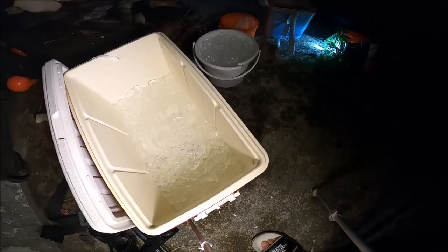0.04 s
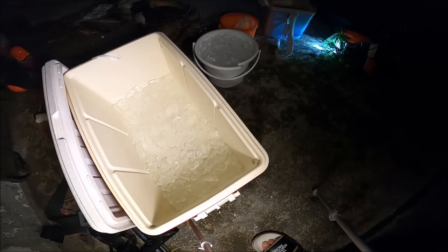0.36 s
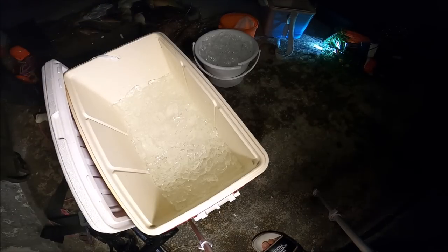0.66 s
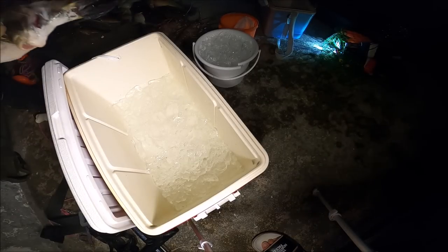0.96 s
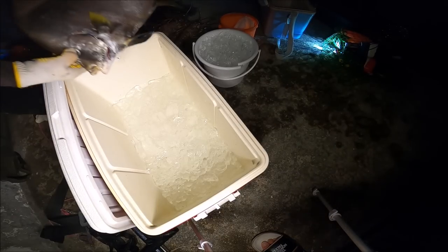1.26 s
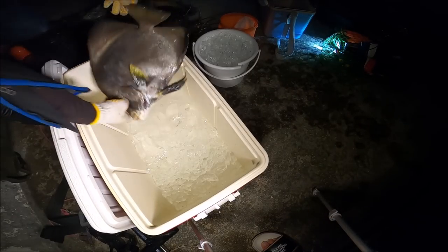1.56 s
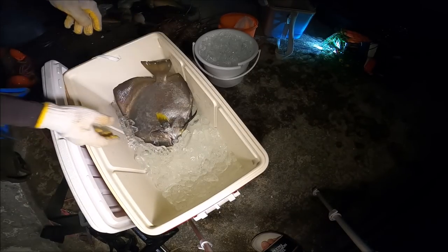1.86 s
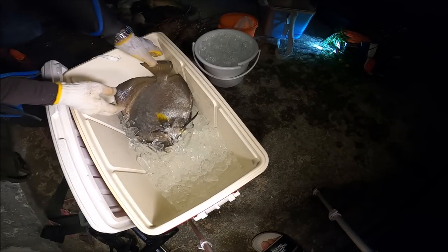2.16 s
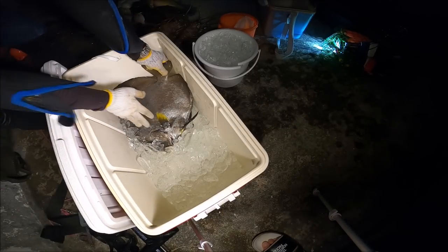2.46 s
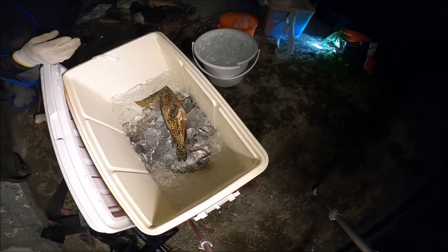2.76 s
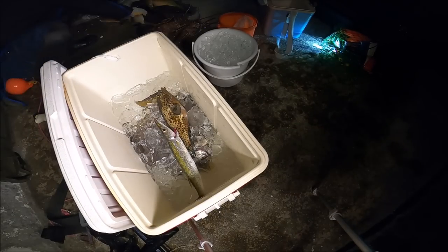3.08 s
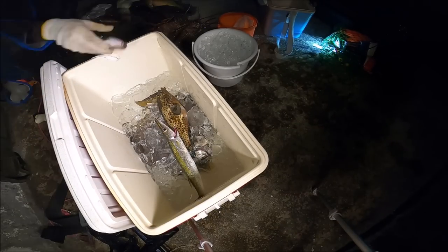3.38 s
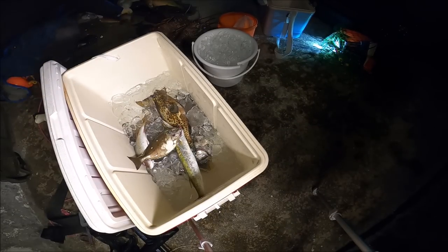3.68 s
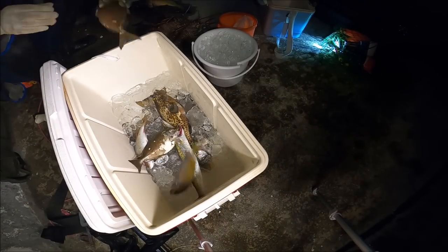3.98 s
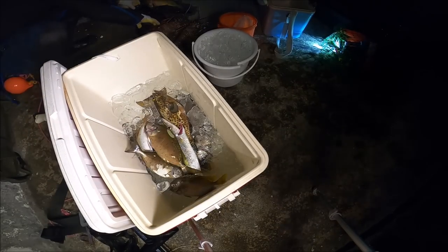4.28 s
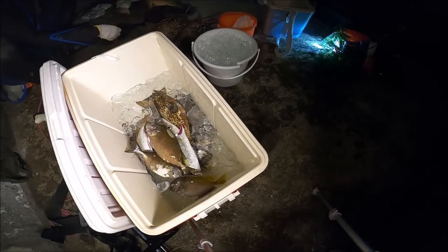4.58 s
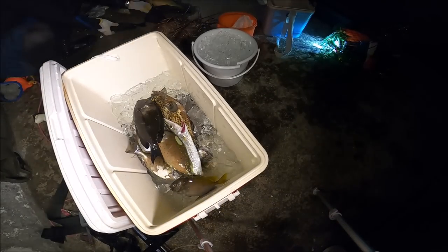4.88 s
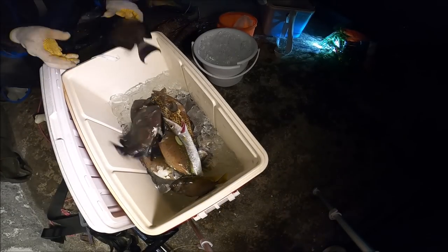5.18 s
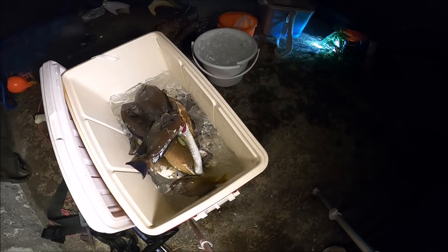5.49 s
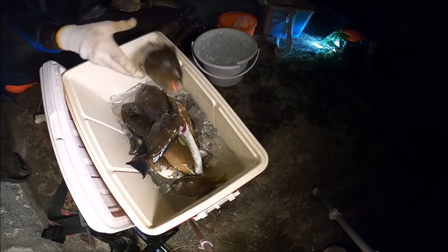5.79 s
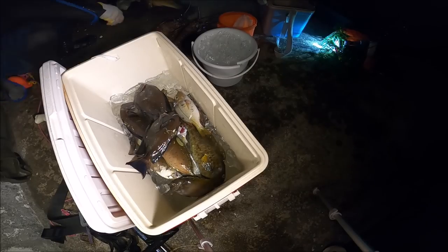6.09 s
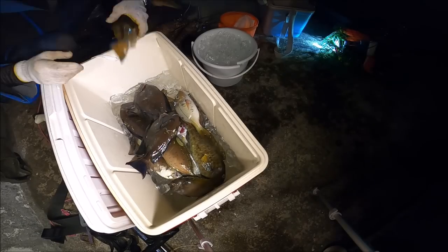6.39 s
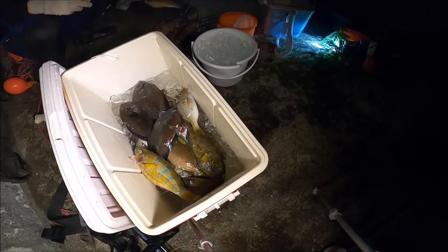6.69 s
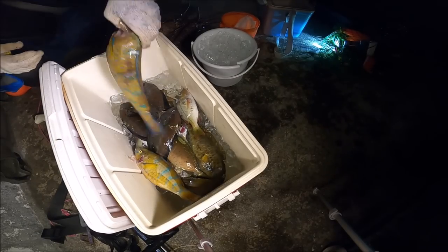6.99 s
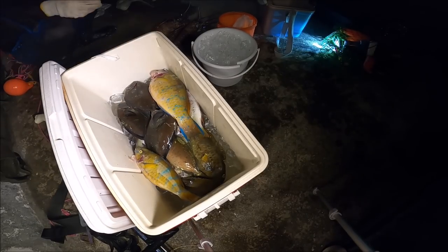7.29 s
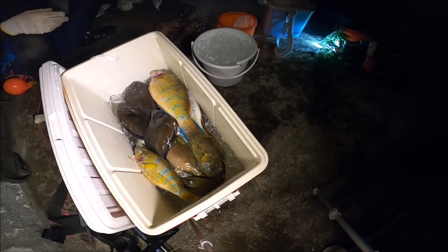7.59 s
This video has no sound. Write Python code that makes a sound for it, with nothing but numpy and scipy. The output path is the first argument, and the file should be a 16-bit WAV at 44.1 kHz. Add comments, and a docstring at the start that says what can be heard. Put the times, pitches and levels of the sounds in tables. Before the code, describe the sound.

Wind buffets the microphone as a big fish crunches into ice in a plastic cooler, then smaller fish land with wet slaps.

```python
"""Fish are packed into a plastic cooler outdoors, with wind on the microphone. First a breeze, a faint sinking
whistle and rustles as a big fish is carried over. At 1.5 s it crunches down into the ice: cubes grind and
knock, and the box booms under its weight. At 2.6 s the scene changes: the wind is stronger and smaller fish
land one after another: water films burst in wet slaps, trapped air pops, droplets tick and the pile settles
with a crackle."""
import sys
import numpy as np
from scipy import signal
from scipy.fft import rfft, irfft
from scipy.io import wavfile
from scipy.ndimage import uniform_filter1d

SR = 44100
rng = np.random.default_rng(int(sys.argv[2]) if len(sys.argv) > 2 else 0)


def wav_out(sig):
    """Save sig, one row per channel (or a flat mono array), as 16-bit PCM at SR to the path in sys.argv[1]."""
    wavfile.write(sys.argv[1], SR, np.round(np.clip(np.atleast_2d(sig).T, -1, 1) * 32767).astype(np.int16))


N = 346185

# open air, calm and windy: f/Hz, density/dB
CALM_SPECTRUM = [(40, 3.5), (180, -1), (300, -8.5), (480, -7), (900, -13.5), (2000, -19), (4000, -27.5),
                 (9000, -37), (12500, -47.5), (15000, -72)]
WINDY_SPECTRUM = [(30, -4.5), (120, -1), (350, -11.5), (750, -7), (1200, -20), (2100, -21), (3300, -27.5),
                  (5000, -29), (9000, -34.5), (15500, -40)]
# open air, calm and windy: t/s, level/dB
CALM_CURVE = [(0, -45.5), (.4, -44.5), (.75, -48.5), (1.0, -49.5), (1.25, -47), (1.45, -45.5), (2.4, -49),
              (2.62, -46)]
WINDY_CURVE = [(2.616, -42), (3.2, -44.5), (3.7, -45), (4.2, -42), (4.55, -42.5), (5.1, -41.5),
               (5.6, -42.5), (6.098, -42.5), (6.45, -39), (6.85, -37.5), (7.3, -39), (7.7, -43),
               (7.85, -45)]
# sinking whistle: t/s, f/Hz, level/dB
WHISTLE_CURVE = [(.28, 2040, -73), (.33, 1996, -61), (.44, 1890, -62), (.6, 1820, -61), (0.721, 1727, -63),
                 (.8, 1604, -59)]
# gusts at the microphone: peak t/s, level/dB, rise/s, fade/s
GUST_SWELLS = [(.21, -30.5, .24, 0.27), (.36, -27.5, .07, 0.13), (.66, -33.5, .07, .6),
               (.93, -16.5, 0.1, 0.044), (1.0, -23, 0.093, 0.07), (1.09, -24.5, 0.045, 0.086),
               (1.2, -24.5, 0.11, .19), (2.23, -26.5, 0.081, 0.066), (2.37, -29, .06, 0.44),
               (2.79, -20.5, 0.029, 0.13), (2.98, -20.5, 0.04, 0.15), (3.2, -35, 0.081, 0.074),
               (3.41, -31.5, 0.027, .035), (3.865, -15.5, 0.18, 0.069), (4.31, -18.5, 0.16, 0.26),
               (4.56, -23, 0.11, 0.028), (4.66, -36, 0.069, 0.14), (4.89, -31, 0.15, 0.086),
               (5.035, -27.5, 0.13, 0.036), (5.14, -25.5, .04, 0.063), (5.45, -29, .07, 0.33),
               (5.56, -21, 0.043, 0.091), (5.75, -27.5, 0.023, 0.096), (5.9, -13, 0.047, 0.039),
               (5.965, -16, 0.077, 0.023), (6.13, -36.5, .04, 0.31), (6.35, -40, 0.041, 0.091),
               (6.465, -15.5, 0.025, .07), (6.69, -17, 0.21, 0.067), (6.8, -26, 0.033, 0.82),
               (7.02, -15.5, 0.064, 0.095), (7.2, -18, 0.25, 0.095), (7.33, -29.5, 0.29, 0.34),
               (7.59, -23, 0.058, 0.046)]
# wind at the microphone, light and strong: f/Hz, density/dB
BREEZE_SPECTRUM = [(10, -5), (30, 2.5), (60, 0), (120, -9), (190, -14.5), (330, -28.5), (700, -46),
                   (2000, -61), (12000, -110)]
GUST_SPECTRUM = [(15, -26), (45, -2.5), (90, 1.5), (220, 0), (400, -6.5), (700, -14), (1100, -23),
                 (2000, -37.5), (4000, -67), (15000, -85)]
# hardest single eddies: t/s, level/dB, f/Hz
EDDIES = [(.364, -22, 55), (.925, -18.5, 112), (1.2, -17, 55), (2.994, -16.5, 139), (4.299, -11.5, 235),
          (4.338, -14, 270), (4.403, -20.5, 290), (4.624, -22, 128), (5.139, -19.5, 101),
          (6.467, -12.5, 189), (6.68, -12, 150), (7.588, -15.5, 155)]
# sudden gust fronts: t/s, level/dB, t60/s
GUST_FRONTS = [(3.701, -28, .2), (3.812, -20.5, 0.2), (4.257, -17, 0.062), (4.396, -18, 0.038),
               (5.848, -18, 0.051), (6.449, -25, 0.19), (6.599, -18, 0.29), (6.666, -24, .13),
               (6.999, -18.5, 0.27), (7.038, -22, .047)]
# friction as the big fish is carried: t/s, level/dB, centre f/Hz, t60/s
CARRY_RUSTLES = [(.257, -48.5, 3500, .05), (.374, -48, 2600, 0.037), (.637, -54.5, 5530, .06),
                 (0.655, -49.5, 3800, 0.067), (0.776, -40, 830, 0.28), (.833, -49, 4640, 0.027),
                 (.95, -53.5, 3300, .1), (1.086, -56, 5000, .05), (1.151, -49, 3500, 0.076),
                 (1.237, -40.5, 2300, 0.036), (1.254, -44, 930, 0.12), (1.337, -52, 5530, .05),
                 (1.37, -53.5, 4000, 0.37)]
# the pile of fish slides: peak t/s, level/dB
PILE_SLIDES = [(2.84, -63), (3.42, -55), (4.0, -54.5), (4.48, -52.5), (5.18, -52), (6.67, -56),
               (7.03, -48.5), (7.28, -57)]
# stray droplets: t/s, level/dB, f/Hz
STRAY_DROPS = [(2.7425, -31, 11000), (2.749, -25.5, 6000), (2.758, -27, 11000), (2.875, -35, 12500),
               (3.601, -22.5, 10900), (4.2244, -37, 9000), (4.428, -36, 12400), (4.48, -36, 9000),
               (5.998, -39, 9000), (6.31, -33.5, 12900), (6.332, -28, 13900), (6.666, -20, 13700),
               (6.762, -33, 9900), (6.843, -34, 12100)]
# trapped air escapes: t/s, level/dB, f/Hz
AIR_POCKETS = [(2.667, -10, 1630), (2.6702, -6, 905), (2.6886, -21, 870), (2.702, -16, 2620),
               (2.7079, -13.5, 1650), (2.7099, -18, 720), (2.9439, -11, 680), (2.9462, -14, 952),
               (3.5044, -11.5, 1880), (4.0691, -12, 1830), (4.1659, -11.5, 1730), (4.7735, -13.5, 960),
               (5.2573, -13, 2960), (5.2602, -16.5, 1630), (5.302, -15.5, 3120), (5.8985, -11, 4310),
               (5.9038, -14.5, 1930), (5.9039, -14, 830), (6.4753, -15, 1080), (7.15, -13.5, 1700),
               (7.7824, -11.5, 1480), (7.7908, -16.5, 1830)]
# cube hits cube: t/s, level/dB, f/Hz
CUBE_KNOCKS = [(1.502, -23.5, 1080), (1.517, -23, 3740), (1.521, -23.5, 1860), (1.82, -17, 4380),
               (1.823, -23, 2540), (1.928, -14, 1490), (1.974, -19.5, 2900), (1.998, -19.5, 3300),
               (2.032, -19.5, 2330), (2.197, -27.5, 2300), (2.239, -34, 2740), (2.265, -37, 2940),
               (2.281, -31.5, 2960), (6.489, -28, 3970), (6.519, -20, 3390), (6.603, -27, 3800)]
# modes of the filled box: f/Hz, nominal width/Hz, level/dB
BOX_MODES = [(162, 24.4, 4), (221.4, 38, 4.5), (391, 67, 5.5), (472, 58, -8), (730, 162, -3.5),
             (1010, 180, -19.5)]
# the big fish loads the box floor: t/s, level/dB
FLOOR_THUMPS = [(1.504, -30), (1.728, -20.5), (1.83, -12), (1.942, -14.5)]
# the big fish touches, shifts, sinks in, settles: t/s, push/dB, grind/dB, hold/s, t60/s
ICE_PRESSES = [(1.498, -20.5, -32, 0.061, 0.3), (1.705, -28.5, -40, 0.026, 0.25),
               (1.797, -18, -18.5, .17, 0.49), (2.193, -52, -47, 0.078, .06)]
# grinding ice: f/Hz, density/dB
ICE_SPECTRUM = [(300, -31), (800, -2), (1250, -5), (1550, 0), (2000, 0), (2500, 0), (3300, -3.5),
                (4500, -9), (6500, -16.5), (10000, -26), (14000, -42), (16000, -54)]
# sharper notes in the ice: f/Hz, width/Hz, level/dB
ICE_MODES = [(1510, 51, 10), (2430, 76, 3), (3080, 100, -20), (4300, 77, -21)]
# wet skin hits skin or ice: t/s, level/dB, rise/s, t60/s, relative mist/dB, relative squelch/dB
FISH_LANDINGS = [(2.658, -15, 0.0041, 0.14, 8.5, -2.5), (2.697, -19.5, 0.011, 0.062, 2, 2),
                 (2.803, -31.5, 0.0012, 0.067, -17, 10), (2.9398, -17.5, 0.0037, 0.18, 7.5, -2),
                 (3.4993, -11.5, 0.0029, 0.038, 3.5, -4), (3.5179, -24.5, 0.0034, 0.021, -9, 5.5),
                 (3.5456, -24, .008, .14, 7, -7.5), (4.04, -21.5, 0.0083, 0.051, 10, -5.5),
                 (4.0678, -16.5, .001, 0.055, 1.5, -4), (4.1045, -21, 0.002, 0.19, 1.5, -3.5),
                 (4.1651, -13.5, 0.00055, 0.015, -15, -1.5), (4.7665, -15.5, .004, 0.12, 1, -3.5),
                 (4.811, -32, .008, 0.07, -2, -3), (4.8433, -36, 0.0018, .035, 1, 6),
                 (5.25, -18, 0.0063, 0.068, 0.5, -1.5), (5.2934, -19.5, 0.0046, 0.1, -0.5, 0),
                 (5.898, -16, .0024, 0.14, -1.5, 0.5), (5.917, -20, .008, 0.076, 9, -1),
                 (5.975, -22, 0.0061, 0.046, -3, -1.5), (6.475, -31.5, .001, 0.33, -11, 6.5),
                 (6.51, -25.5, .006, .08, 2, -2.5), (6.5396, -27, .001, 0.028, -1, 5),
                 (6.56, -26.5, .01, .09, -5, 4), (6.602, -25.5, .0005, 0.018, 1, -13),
                 (7.014, -34.5, 0.0043, 0.19, -21, 13.5), (7.087, -32, 0.0054, .03, -7, -7),
                 (7.1395, -18, 0.01, .045, -3, 0), (7.163, -24, .0037, 0.057, 1, 2),
                 (7.1794, -22.5, .001, 0.042, -3, 3), (7.773, -18, 0.0048, 0.099, -1, -0.5)]
# coarse spray, fine mist, hollows under a fish: f/Hz, density/dB
SPRAY_SPECTRUM = [(400, -9), (1000, 5), (2400, -6.5), (3200, 3.5), (4500, 3.5), (7000, 0.5), (9000, -8),
                  (15000, -5.5)]
MIST_SPECTRUM = [(4000, -14), (7000, -3), (9000, -1), (12000, -1), (15500, -4)]
HOLLOW_SPECTRUM = [(150, -3), (400, -17.5), (650, 1.5), (950, -6), (1300, -6), (1700, -2.5), (2000, -5),
                   (2400, -14.5), (3100, -10), (5500, -54.5)]


def amp(db):
    """dB to gain."""
    return 10 ** (np.asarray(db) / 20)


def unit(x):
    """Scale to rms 1."""
    return x / np.sqrt(np.mean(x ** 2) + 1e-20)


def clock():
    """Sample times in s."""
    return np.arange(N) / SR


def decay(t, t60_s):
    """Gain falling 60 dB in t60_s."""
    return np.exp(-np.log(1000) * t / t60_s)


def add(mix, at_s, sound):
    """Mix a sound in at at_s."""
    part = mix[round(at_s * SR):][:len(sound)]
    part += sound[:len(part)]


def level(times_s, levels_db):
    """Gain along a level curve, silent outside it."""
    return amp(np.interp(clock(), times_s, levels_db, left=-140, right=-140))


def swells(rows, span_db=20):
    """Gain of swells summed in power; each rise and fade covers span_db."""
    t = clock()[::64]
    power = sum(amp(db - span_db * np.maximum((peak_s - t) / rise_s, (t - peak_s) / fade_s)) ** 2
                for peak_s, db, rise_s, fade_s in rows)
    return np.interp(clock(), t, np.sqrt(power))


def colour(x, spectrum):
    """Filter x by a spectrum; rms 1."""
    hz, db = np.transpose(spectrum)
    f = np.fft.rfftfreq(N, 1 / SR)
    gain = amp(np.interp(np.log(f + 1), np.log(hz), db))
    return unit(irfft(rfft(x) * gain, N))


def hiss(spectrum):
    """Coloured Gaussian noise, rms 1."""
    return colour(rng.standard_normal(N), spectrum)


def wander(rate_hz):
    """Random drift up to about rate_hz, rms 1."""
    f = np.fft.rfftfreq(N, 1 / SR)
    return unit(irfft(rfft(rng.standard_normal(N)) * np.exp(-(f / rate_hz) ** 2), N))


def flicker(depth_db, rate_hz):
    """Gain drifting by depth_db rms."""
    return amp(depth_db * wander(rate_hz))


def grains(per_s, spread_db):
    """Random clicks of either sign and uneven size, rms 1."""
    size = amp(spread_db * np.minimum(rng.exponential(1, N), 4))
    return unit(size * rng.choice([-1, 1], N) * (rng.random(N) < per_s / SR))


def resonate(x, hz, width_hz):
    """One resonance, peak gain 1."""
    return signal.lfilter(*signal.iirpeak(hz, hz / width_hz, SR), x)


def turbulence(spectrum, evenness, span_s):
    """Noise with its own swells flattened by evenness (0 to 1), rms 1."""
    noise = hiss(spectrum)
    power = abs(uniform_filter1d(noise ** 2, int(span_s * SR))) + 1e-9
    return unit(noise / power ** (evenness / 2))


def open_air():
    """Soft outdoor wash, louder in the windier second scene."""
    calm = level(*np.transpose(CALM_CURVE)) * hiss(CALM_SPECTRUM) * flicker(0.65, 26)
    windy = level(*np.transpose(WINDY_CURVE)) * hiss(WINDY_SPECTRUM) * flicker(1.5, 33)
    return calm + windy


def whistle(core_hz=110, halo_hz=650, halo_db=3):
    """A narrow noise band inside a wider one, both sinking in pitch."""
    times_s, hz, db = np.transpose(WHISTLE_CURVE)
    carrier = np.exp(2j * np.pi * np.cumsum(np.interp(clock(), times_s, hz)) / SR)
    core, halo = (wander(width_hz) + 1j * wander(width_hz) for width_hz in (core_hz, halo_hz))
    return level(times_s, db) * (carrier * (core + amp(halo_db) * halo)).real


def wind(windier_s=2.62, breeze_db=1, gust_db=-1, tear_db=-19, strong_db=-20):
    """Gusts press on the microphone; after windier_s the strongest tear into a brighter flutter."""
    windier = clock() > windier_s
    lull = np.where(windier, amp(-46), amp(-43))
    force = np.hypot(swells(GUST_SWELLS), lull)
    breeze = amp(breeze_db) * force * ~windier
    gust = amp(gust_db) * force * windier
    flutter = hiss([(200, -24), (600, 14), (1100, -4), (2000, -7), (4000, -19.5), (15000, -54)])
    tearing = amp(tear_db) * gust ** 2 / amp(strong_db) * flutter * flicker(3.9, 90)
    rumble = breeze * turbulence(BREEZE_SPECTRUM, evenness=0.26, span_s=0.074)
    roar = gust * turbulence(GUST_SPECTRUM, evenness=0.34, span_s=0.036)
    return rumble + roar + tearing


def eddies(jitter_cycles=0.13, length_s=0.014):
    """Each eddy is a brief, uneven swing of pressure on the microphone."""
    out, t = np.zeros(N), np.arange(SR // 5) / SR - 0.1
    jitter = jitter_cycles * wander(200)
    window = np.exp(-(2 * t / length_s) ** 2)
    for (at_s, db, hz), phase in zip(EDDIES, rng.random(len(EDDIES))):
        swing = np.sin(2 * np.pi * (hz * t + phase + jitter[round(at_s * SR):][:len(t)]))
        add(out, at_s + t[0], amp(db) * window * swing)
    return out


def gust_fronts(rise_s=0.0053):
    """A front slams in and flutters as it dies."""
    force, t = np.zeros(N), np.arange(SR // 3) / SR
    for at_s, db, t60_s in GUST_FRONTS:
        add(force, at_s, amp(db) * np.minimum(t / rise_s, 1) * decay(t, t60_s))
    spectrum = [(80, -37), (250, 11.5), (600, 2), (1000, -1),
                (1500, -12), (2500, -26), (5000, -50), (12000, -66)]
    return force * turbulence(spectrum, evenness=1, span_s=0.0089) * flicker(4, 67)


def rustles(width_ratio=0.48, rise_share=0.051, cutoff_hz=9000):
    """Soft bands of friction noise; longer ones rise more slowly."""
    out, t = np.zeros(N), np.arange(SR // 4) / SR
    for at_s, db, hz, t60_s in CARRY_RUSTLES:
        band = resonate(rng.standard_normal(len(t)), hz, width_ratio * hz)
        band = unit(resonate(band, hz, 2 * width_ratio * hz))
        add(out, at_s, amp(db) * band * np.minimum(t / (rise_share * t60_s), 1) * decay(t, t60_s))
    return signal.lfilter(*signal.butter(2, cutoff_hz, fs=SR), out)


def settling(rise_s=0.24, fade_s=0.43):
    """Tiny bubbles and water films burst between the sliding fish."""
    bursts = grains(per_s=350, spread_db=2.6)
    crackle = colour(bursts, [(2000, -14), (5000, 4.5), (9000, -0.5), (15500, -1)])
    sliding = swells([(peak_s, db, rise_s, fade_s) for peak_s, db in PILE_SLIDES])
    return sliding * crackle * flicker(1, 18)


def walls(x, wet_db=-15, t60_s=0.15, echoes_per_s=2500, gap_s=0.002):
    """Add short, dense reflections between the cooler walls."""
    t = np.arange(SR // 5) / SR
    taps = rng.standard_normal(len(t)) * (rng.random(len(t)) < echoes_per_s / SR)
    taps *= (t > gap_s) * decay(t, t60_s)
    return x + amp(wet_db) * signal.fftconvolve(x, taps / np.linalg.norm(taps))[:N]


def droplets(tick_db=-4, ring_db=-5, tick_t60_s=0.019, ring_t60_s=0.013, width_hz=1600):
    """Each drop ticks and rings a tiny bubble."""
    out, t = np.zeros(N), np.arange(SR // 12) / SR
    for at_s, db, hz in STRAY_DROPS:
        noise = rng.standard_normal(len(t))
        ring = unit(resonate(resonate(noise, hz, width_hz), hz, width_hz)) * decay(t, ring_t60_s)
        tick = noise * decay(t, tick_t60_s)
        add(out, at_s, amp(db) * (amp(ring_db) * ring + amp(tick_db) * tick))
    return out


def pops(rise_s=0.00071, glide_per_s=4, hollow_db=-4):
    """An air pocket rings raggedly for a few cycles and excites a short hollow ring."""
    out, t = np.zeros(N), np.arange(SR // 50) / SR
    envelope = t / rise_s * np.exp(1 - t / rise_s)
    for (at_s, db, hz), phase in zip(AIR_POCKETS, rng.random(len(AIR_POCKETS))):
        cycles = phase + hz * t * (1 + glide_per_s * t / 2)
        add(out, at_s, amp(db) * envelope * np.sin(2 * np.pi * cycles))
    out *= unit(flicker(1.5, 1600))
    return out + amp(hollow_db) * resonate(out, hz=1760, width_hz=100)


def cubes(ring_t60_s=0.041, scrape_t60_s=0.037, scrape_db=-4):
    """A knocked cube rings in two modes, rattles against its neighbours and scrapes."""
    out, t = np.zeros(N), np.arange(SR // 12) / SR
    friction = hiss(ICE_SPECTRUM)
    rattle = unit(flicker(3, 700))
    for at_s, db, hz in CUBE_KNOCKS:
        now = slice(round(at_s * SR), round(at_s * SR) + len(t))
        modes = np.sin(2 * np.pi * hz * t) + 0.29 * np.sin(2 * np.pi * 1.62 * hz * t)
        ring = modes * rattle[now] * decay(t, ring_t60_s)
        scrape = amp(scrape_db) * friction[now] * decay(t, scrape_t60_s)
        add(out, at_s, amp(db) * (ring + scrape))
    return out


def thumps(rise_s=0.0048):
    """A soft, heavy push rings the box modes."""
    out, t = np.zeros(N), np.arange(SR // 4) / SR
    for at_s, db in FLOOR_THUMPS:
        boom = np.zeros(len(t))
        for hz, width_hz, mode_db in BOX_MODES:
            envelope = amp(mode_db) * np.exp(-np.pi * width_hz * t / 2)
            boom += envelope * np.sin(2 * np.pi * (hz * t + rng.random()))
        add(out, at_s, amp(db) * boom * (1 - np.exp(-t / rise_s)))
    return out


def pressing(rise_s=0.023, sag_db=5.5):
    """Push and grind gains: each press builds, holds, lets go; the ice grinds less as it packs."""
    push, grind, t = np.zeros(N), np.zeros(N), np.arange(SR // 2) / SR
    for at_s, push_db, grind_db, hold_s, t60_s in ICE_PRESSES:
        weight = np.minimum(t / rise_s, 1) * decay(np.maximum(t - rise_s - hold_s, 0), t60_s)
        packed = np.clip((t - rise_s) / hold_s, 0, 1)
        add(push, at_s, amp(push_db) * weight)
        add(grind, at_s, amp(grind_db - sag_db * packed) * weight)
    return push, grind


def ice_bed(ice_db=-1.5, notes_db=-11):
    """Cubes grind past each other under the big fish and drum on the box."""
    push, grind = pressing()
    thuds = grains(per_s=3000, spread_db=2.9)
    box = sum(amp(db) * resonate(resonate(thuds, hz, 1.8 * width_hz), hz, 3 * width_hz)
              for hz, width_hz, db in BOX_MODES)
    box = colour(box, [(95, -24), (145, 2)])  # a small box radiates little deep bass
    slips = grains(per_s=4500, spread_db=1.5)
    notes = sum(amp(db) * resonate(slips, hz, width_hz) for hz, width_hz, db in ICE_MODES)
    notes = colour(notes, [(4500, -4), (12000, -27)])
    crunch = colour(slips, ICE_SPECTRUM) * flicker(1.5, 99) + amp(notes_db) * notes
    return push * box + amp(ice_db) * grind * crunch


def slaps(splash_db=-3, squelch_db=-2, squelch_lag_s=0.0018, snap_share=0.27, snap_t60_s=0.012):
    """A fish lands: its water film bursts into spray and mist, then the hollows under it squelch."""
    spray_power, mist_power, hollow_power = np.zeros((3, N))
    t = np.arange(SR // 4) / SR
    for at_s, db, rise_s, t60_s, mist_db, hollow_db in FISH_LANDINGS:
        after_s = np.maximum(t - rise_s, 0)
        fall = snap_share * decay(after_s, snap_t60_s) + (1 - snap_share) * decay(after_s, t60_s)
        power = (amp(db) * np.minimum(t / rise_s, 1) * fall) ** 2
        mist_share = amp(mist_db) ** 2 / (1 + amp(mist_db) ** 2)
        add(spray_power, at_s, 2 * power * (1 - mist_share))
        add(mist_power, at_s, 2 * power * mist_share)
        add(hollow_power, at_s + squelch_lag_s, power * amp(hollow_db) ** 2)
    spray = np.sqrt(spray_power) * colour(grains(per_s=9000, spread_db=1.4), SPRAY_SPECTRUM)
    mist = np.sqrt(mist_power) * colour(grains(per_s=14000, spread_db=3), MIST_SPECTRUM)
    squelch = np.sqrt(hollow_power) * hiss(HOLLOW_SPECTRUM) * flicker(0.36, 170)
    return amp(splash_db) * (spray + mist) * flicker(2.5, 320) + amp(squelch_db) * squelch


def scene():
    """Ice and fish in the box, wind and air around it; mono."""
    in_box = walls(ice_bed() + thumps() + cubes() + slaps() + pops() + droplets()) + settling()
    return (in_box + rustles() + wind() + eddies() + gust_fronts() + open_air() + whistle())[None]


def record(dry, ceiling=0.65, cutoff_hz=16000):
    """Soft clip, then low-pass."""
    rounded = ceiling * np.tanh(dry / ceiling)
    lowpass = signal.firwin(301, cutoff_hz, window=("kaiser", 8), fs=SR)
    return signal.oaconvolve(rounded, lowpass[None], "same")


dry = scene()
out = record(dry)
wav_out(out)
```